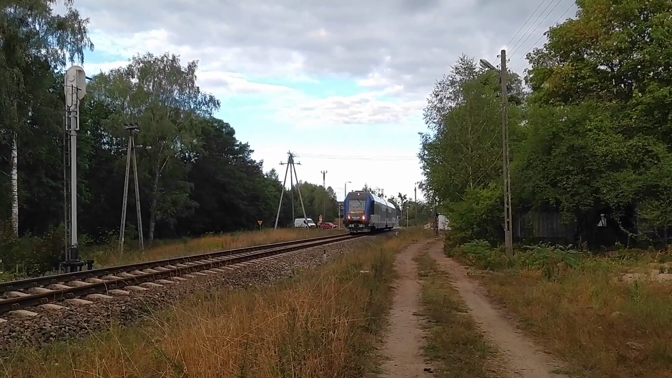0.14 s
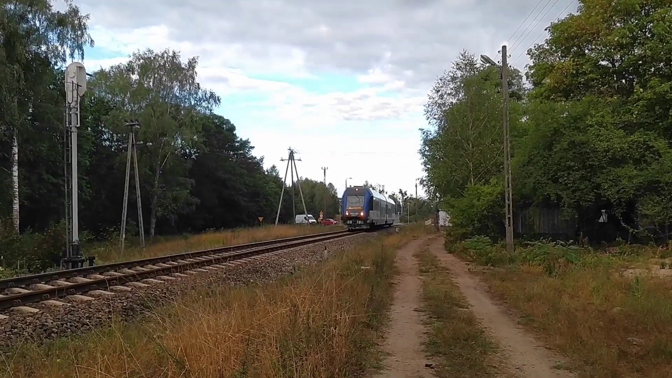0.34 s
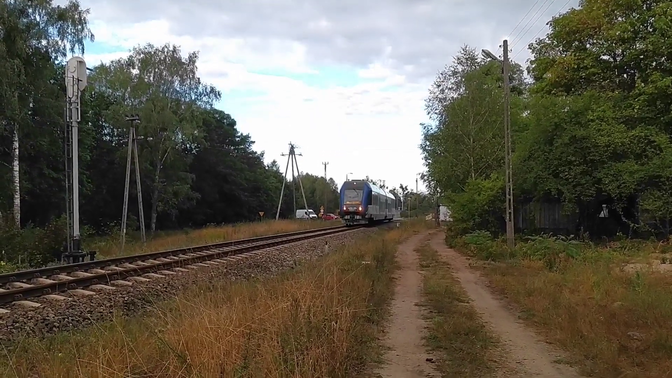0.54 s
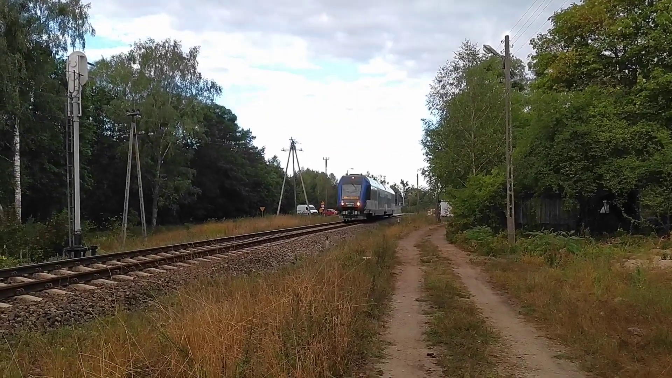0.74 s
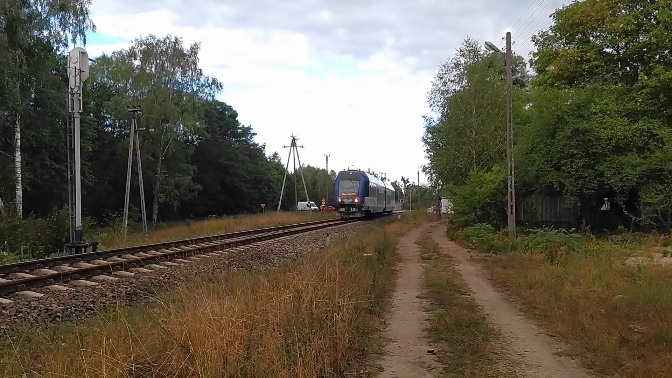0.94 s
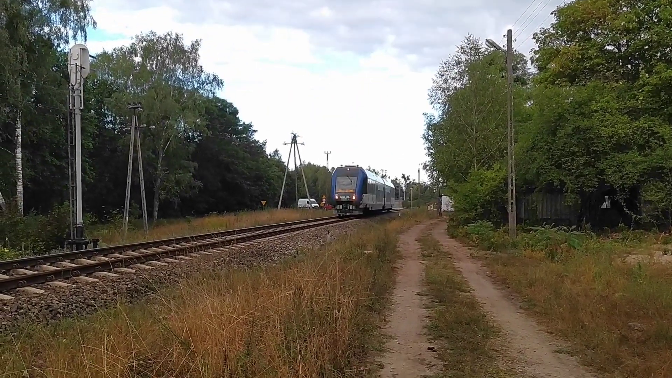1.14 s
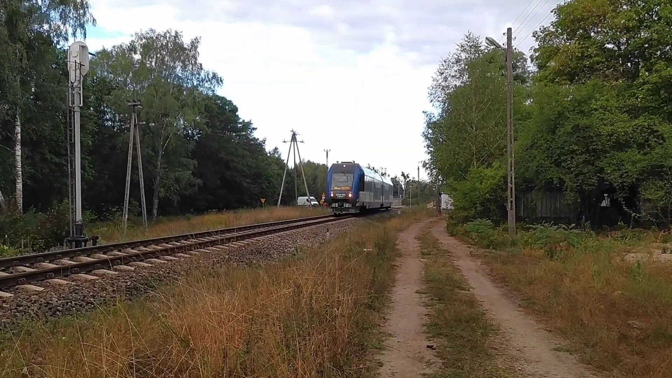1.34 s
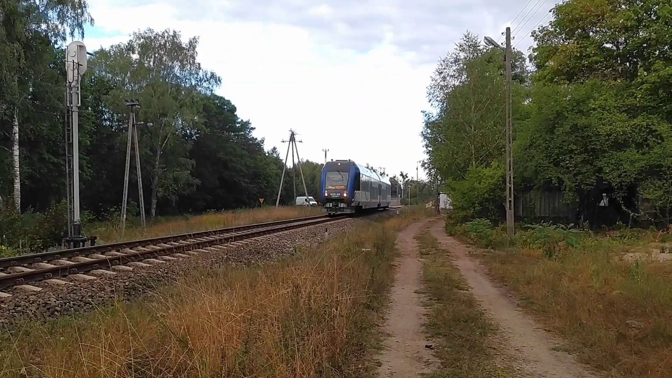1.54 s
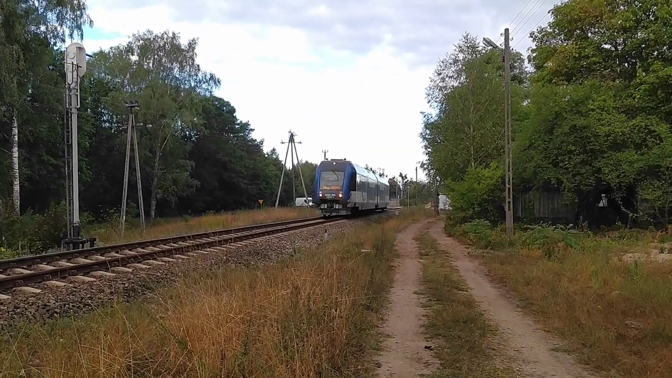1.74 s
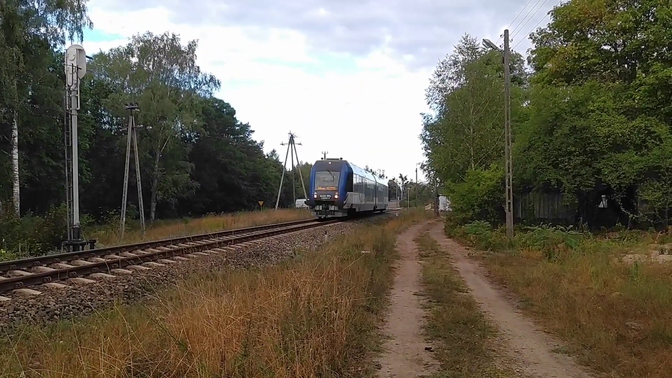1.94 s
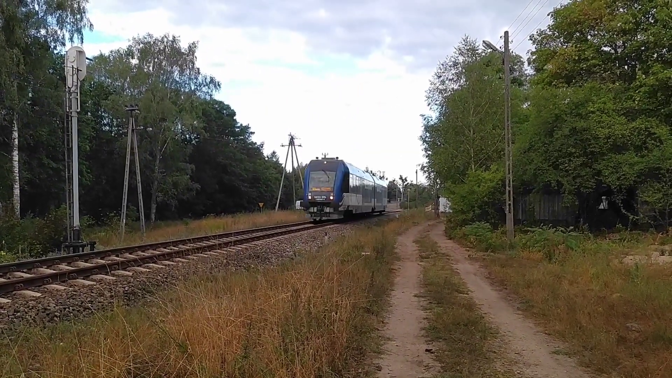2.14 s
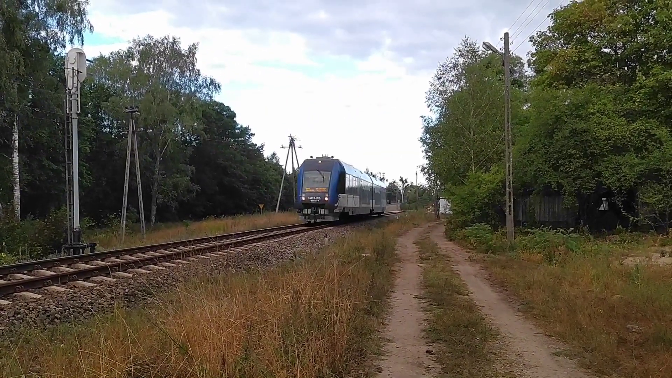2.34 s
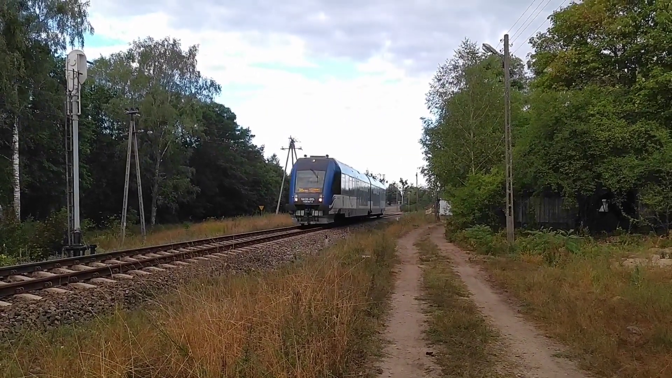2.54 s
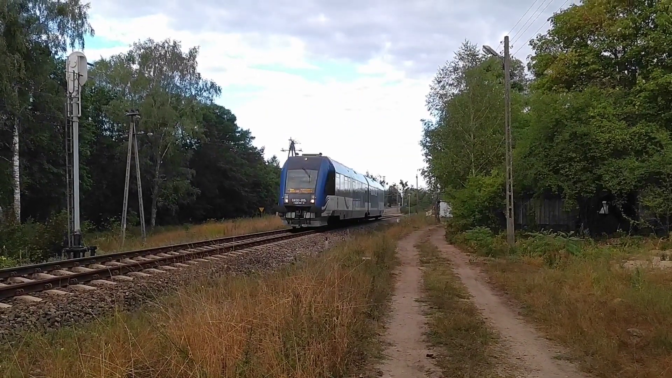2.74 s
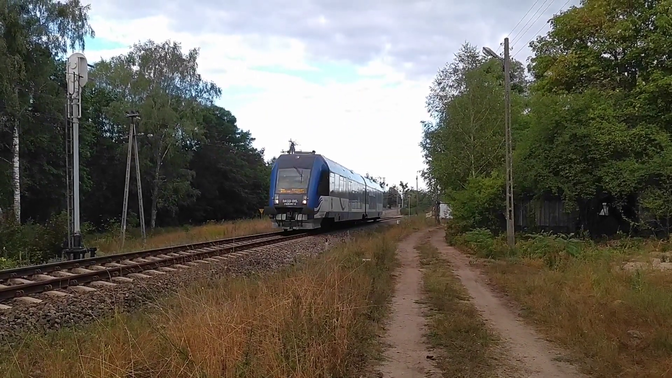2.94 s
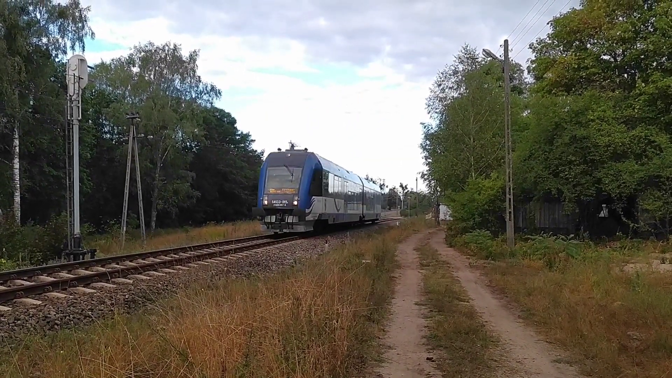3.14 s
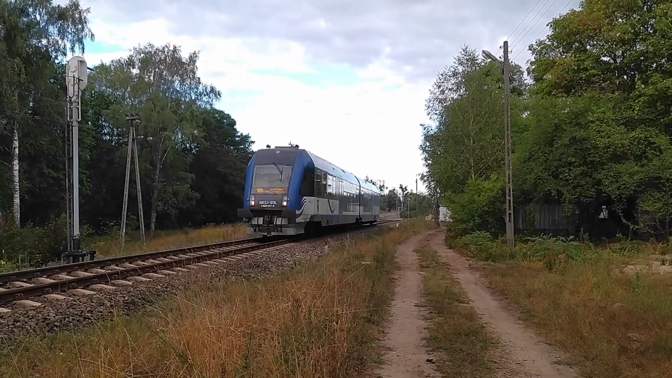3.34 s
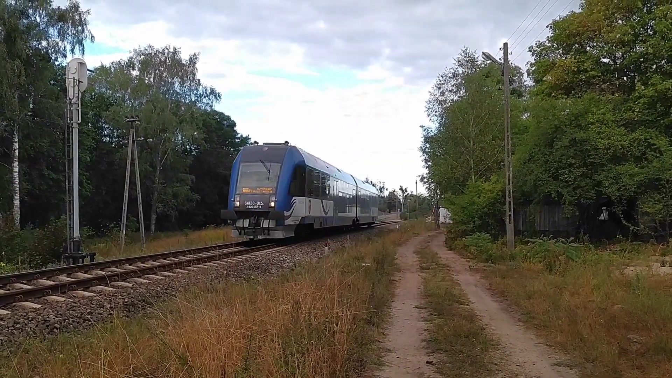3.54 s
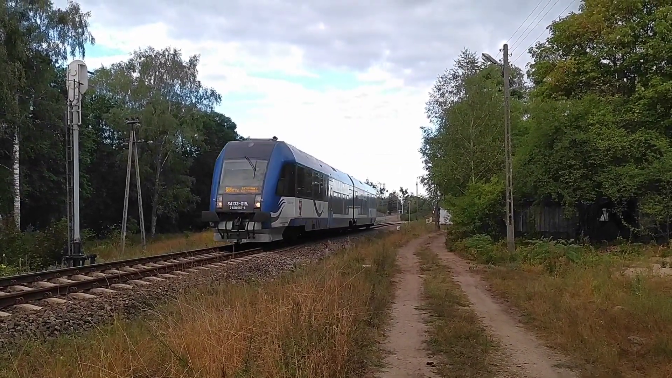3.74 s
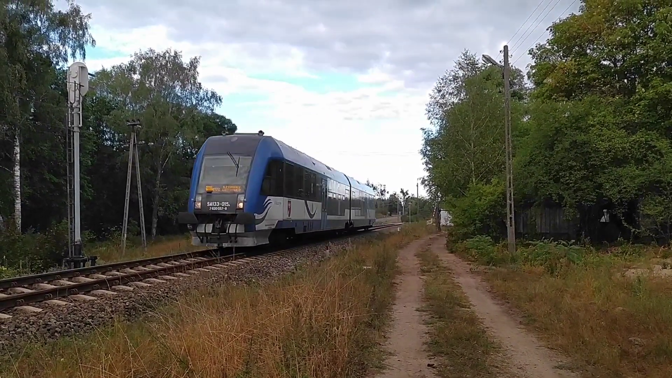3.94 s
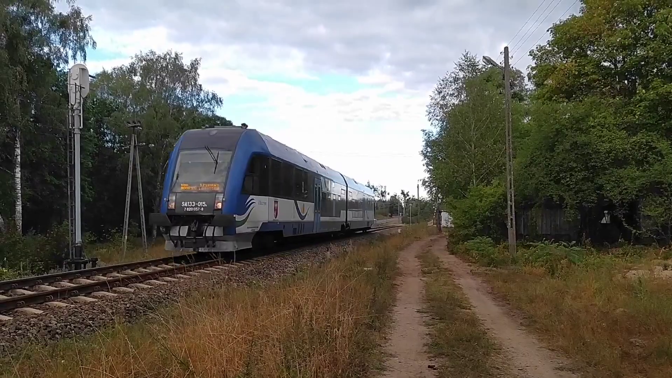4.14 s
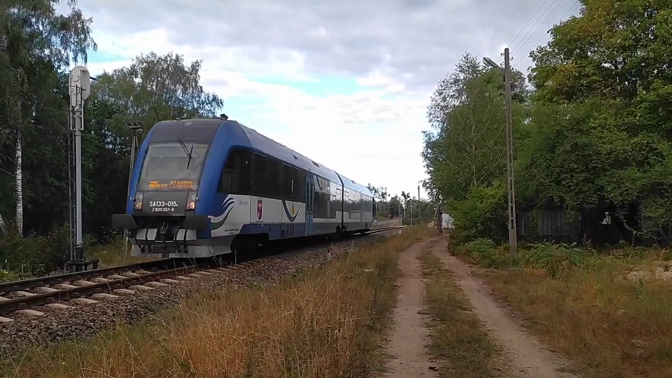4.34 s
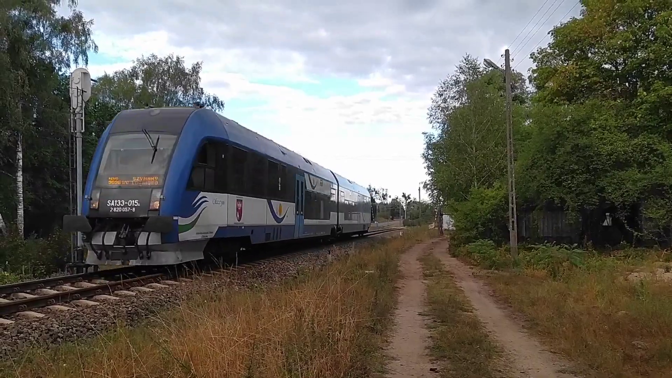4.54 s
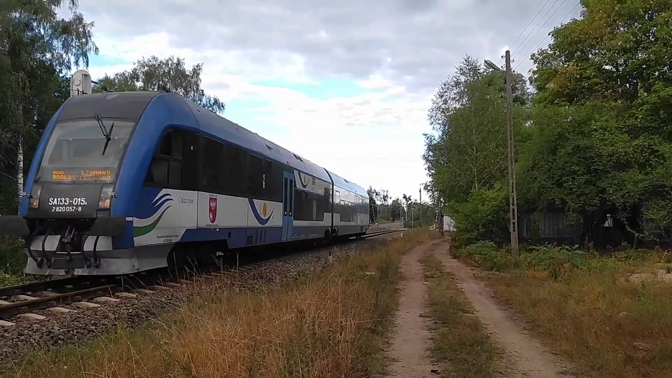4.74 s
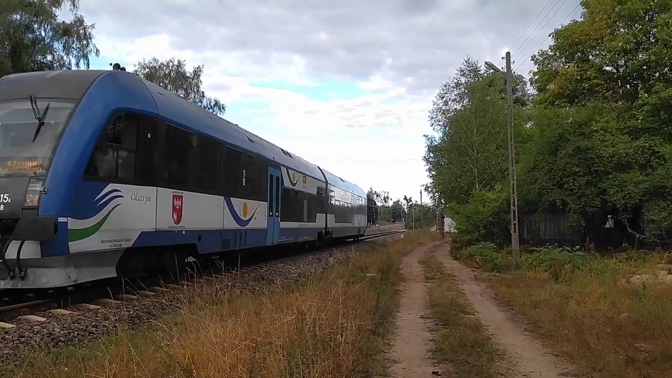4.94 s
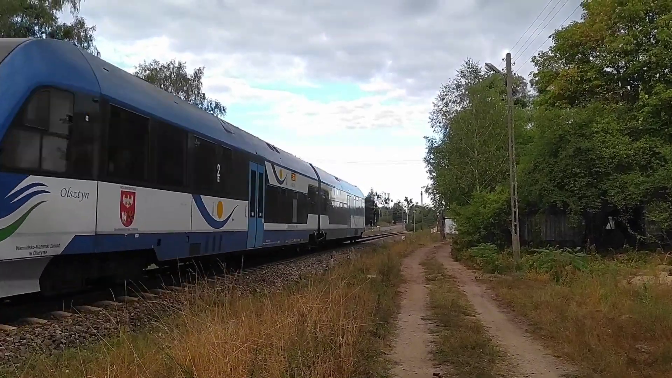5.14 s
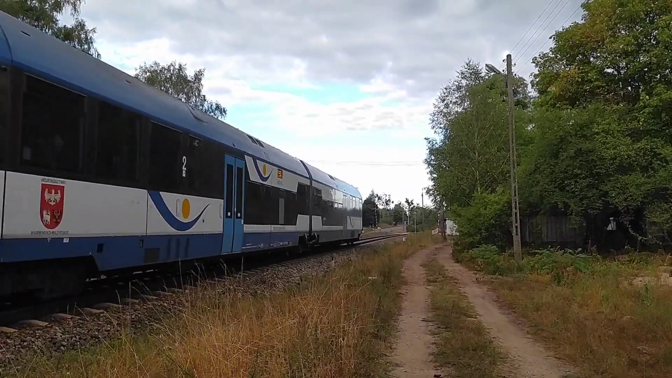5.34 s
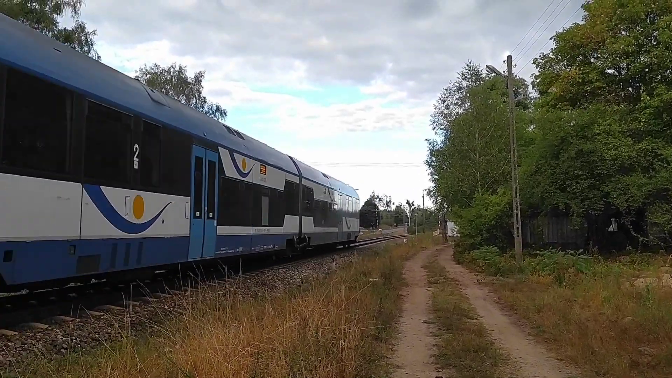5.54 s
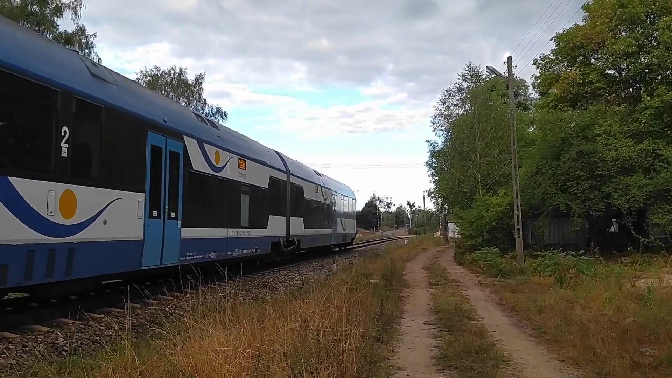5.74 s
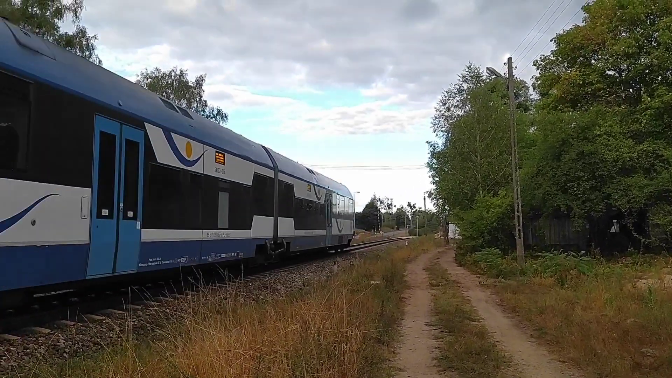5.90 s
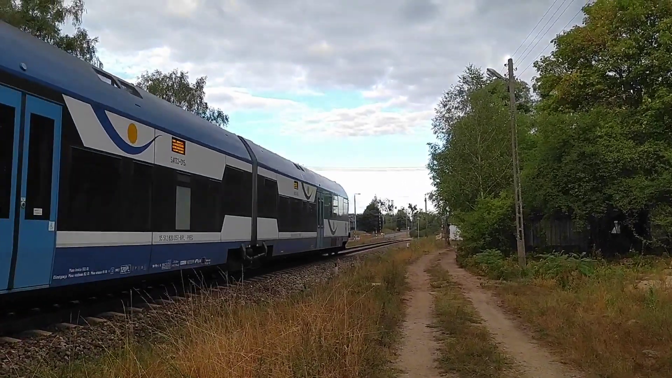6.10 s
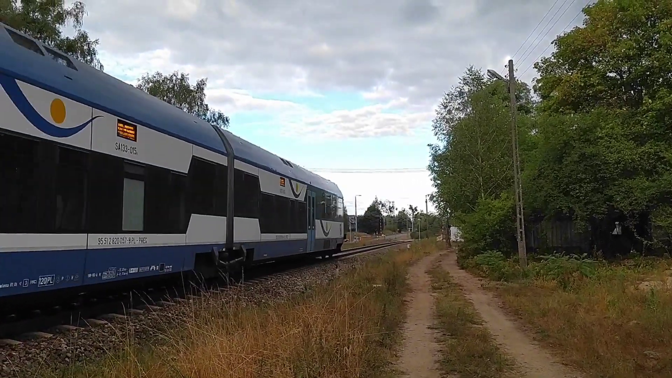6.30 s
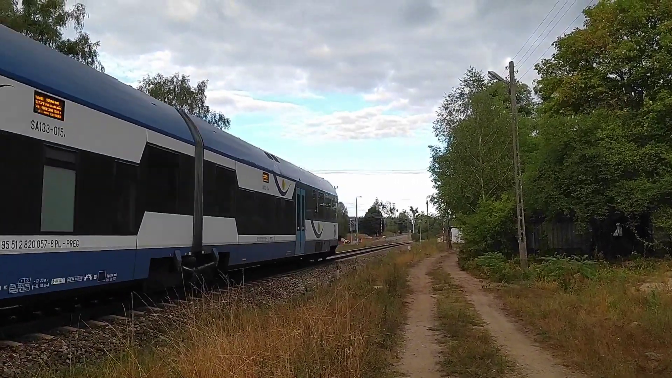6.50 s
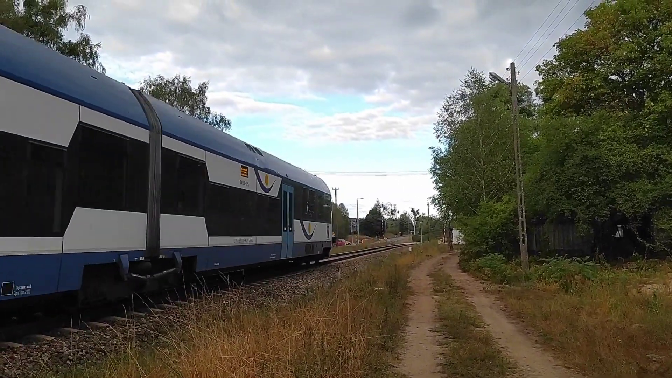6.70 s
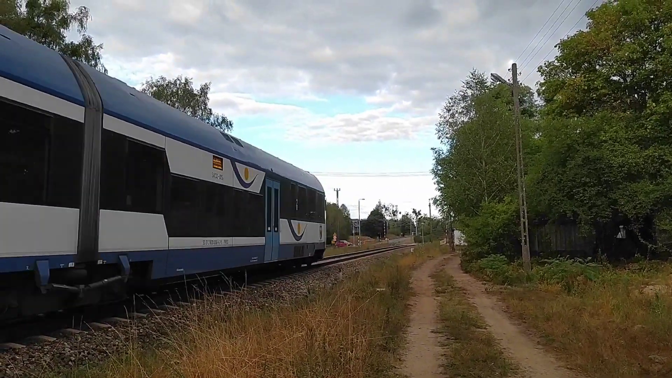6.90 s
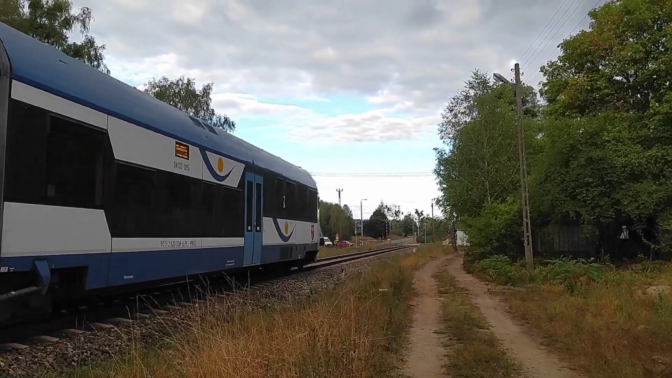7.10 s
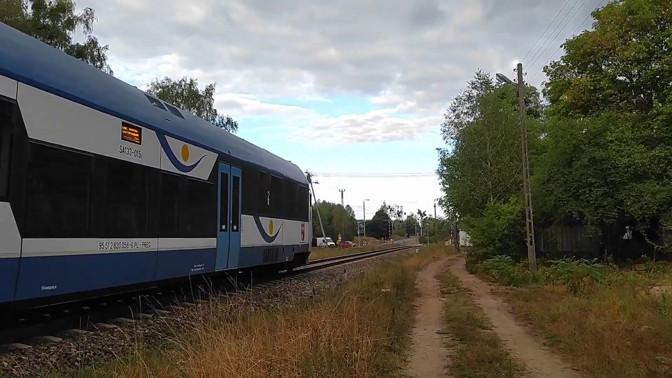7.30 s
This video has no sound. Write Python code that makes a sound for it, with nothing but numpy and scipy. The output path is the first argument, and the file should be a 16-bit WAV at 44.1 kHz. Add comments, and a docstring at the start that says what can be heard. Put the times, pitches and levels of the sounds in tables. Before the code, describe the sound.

A diesel railbus approaches through woods, droning and whistling, then roars past very close with two sharp rail-joint clacks and rattling running gear.

```python
"""A diesel railbus comes out of the woods and passes a few metres from a hand-held camera.
Its exhaust drones in steady tones, the turbochargers wind down as wavering whistles in hazy noise,
the wheels roar as shaped noise with singing resonances, and ringing modes make the joint clacks and knocks.
The right port hears the train; the covered left one picks up little but the rumble and knocks of the hand."""
import sys
import numpy as np
from scipy import signal
from scipy.fft import rfft, irfft
from scipy.io import wavfile
from scipy.ndimage import uniform_filter1d

SR = 44100
rng = np.random.default_rng(int(sys.argv[2]) if len(sys.argv) > 2 else 0)


def dump_mix(stems):
    """Bounce the given channels to the path in sys.argv[1] as a 16-bit WAV at rate SR."""
    frames = np.atleast_2d(stems).T  # one column per channel
    limited = np.clip(frames, -1, 1)  # hard clip at full scale
    pcm = np.round(limited * 32767).astype(np.int16)
    wavfile.write(sys.argv[1], SR, pcm)


N = 328986
TIME = np.arange(N) / SR
# the roar is built in overlapping short frames, each with its own spectrum
FRAME = 2048  # samples
HOP = FRAME // 4
FRAME_S = np.arange(N // HOP + 3)[:, None] * HOP / SR
BIN_HZ = np.fft.rfftfreq(FRAME, 1 / SR)

# Every "pass" tuple below is: peak level in dB, loudest moment in seconds,
# half-width in seconds, dB lost per tenfold distance.

# The hand and small sounds nearby
# Rumble colour of the hand. Each row: frequency in Hz, relative level in dB per Hz.
HAND_COLOUR = [(4, -57), (12, -38), (24, -52), (45, -55), (70, -66.5), (105, -85), (170, -86), (350, -99),
               (700, -106), (1900, -114), (3300, -121), (12000, -128)]
# Loudness of that rumble. Each row: time in seconds, level in dB.
HAND_LEVEL = [(0, -33.5), (1.9, -33), (3.2, -29.5), (5.3, -30.5), (7.46, -30.5)]
# Firmest knocks of the hand. Each row: start in seconds, level in dB.
HAND_KNOCKS = [(.249, -27), (1.108, -23.5), (2.95, -17), (4.187, -19), (4.636, -24), (4.931, -15.5),
               (5.72, -26), (6.071, -20)]
# The fingertip gives like a soft spring.
# Each row: frequency in Hz before a random change of stiffness, level in dB, time to fall 60 dB in seconds.
FINGERTIP_MODES = [(65, 4, 0.033), (128, -5, 0.034), (219, -12, 0.052)]
SOFT_KNOCKS_PER_S, SOFT_KNOCK_DB, SOFT_KNOCK_SPREAD_DB = 2.2, -40, 5
# Faint dry ticks nearby. Each row: time of the snap in seconds, level in dB.
TICKS = [(.715, -55), (.971, -54), (2.49, -61), (2.69, -63)]
# What a tick is made of. Each row: seconds after the snap (negative is before), lowest Hz, highest Hz,
# level in dB, time to fall 60 dB in seconds.
TICK_PARTS = [(-.011, 4200, 4800, -4, .12), (0, 6700, 8100, 0, .06), (0, 8100, 12000, -17, .06),
              (.011, 5800, 7500, -7, .05)]

# Air and running gear
# Air hissing along the cars. Each row: time in seconds, level in dB.
SLIPSTREAM_LEVEL = [(0, -139), (5, -70), (6, -58.5), (6.5, -51.5), (7, -62.5), (7.46, -58.5)]
RATTLES_PER_S, RATTLE_SPREAD_DB = 24, 9
RATTLE_PASS = (-28, 6.5, .7, 36)
# Knocks in the bogie. Each row: start in seconds, level in dB.
CLUNKS = [(5.937, -29), (6.3505, -27), (6.3925, -23), (6.5455, -22.5), (6.5505, -24), (6.571, -27),
          (6.642, -27), (6.705, -24), (7.137, -29), (7.248, -27)]
# Slack sleepers pressed down. Each row: start in seconds, level in dB.
THUMPS = [(5.14, -41), (5.365, -39), (5.732, -35), (5.97, -36), (6.147, -36), (7.324, -36)]
# Wheels over the joint. Each row: start in seconds, level in dB, treble tilt in dB per octave,
# rebound level in dB relative to the blow, delay of the sleeper's thud in seconds.
JOINTS = [(6.3402, -23, -.4, -4, .002), (6.5312, -23.5, 1.2, -.5, .0115)]
REBOUND_S, RAIL_LAG_S = .004, .0026
# What a joint blow shakes loose, before the treble tilt. Each row: lowest Hz, highest Hz, level in dB,
# rise in seconds, time to fall 60 dB in seconds.
CLATTER = [(147, 397, -3, 0.008, 0.2), (382, 1500, -2, 0.006, 0.22), (1300, 2600, -1.5, 0.0006, 0.12),
           (2500, 3800, -2.5, 0.003, 0.11), (3800, 7000, -7.5, 0.0004, 0.1), (7050, 12000, -23, .001, 0.08)]
# Modes that ring at each blow, slightly retuned each time. Each row: frequency in Hz, level in dB,
# rise in seconds, time to fall 60 dB in seconds. The joint also tilts the wheel levels,
# and the rattle also shifts the frame pitches.
WHEEL_MODES = [(1434, -9, .0017, .27), (1540, 13.5, .0008, .015), (2020, 10, .0006, .02),
               (2600, 1, .0008, .035), (3380, -4, .0005, .04)]
RAIL_MODES = [(627, -10, .0063, .11), (560, 13, .0016, .014), (860, 8, .0014, .016)]
FRAME_MODES = [(425, -5, .002, .09), (620, 2, .0015, .035), (890, -4, .001, .04), (1300, -2, .0008, .025)]
SLEEPER_MODES = [(204, 9, 0.008, .16), (272, 7.5, 0.009, 0.12)]

# Wheels and rails
PASS_S, SPEED, TRACK_DISTANCE = 6.15, 13.2, 6.6  # train abreast (s), speed (m/s), distance to the track (m)
# A pair of tones under the leading car: lower tone at rest (Hz), abreast (s)
WHINE_HZ, WHINE_ABREAST_S = 3462, 5.95
WHINE_SWELL = (5.75, 2.2, -46)  # loudest at (s), length (s), dB
# The ringing wheel: pitch at rest (Hz), abreast (s)
RING_HZ, RING_ABREAST_S = 1458, 6.2
# Its swells. Each row: loudest moment in seconds, length in seconds, level in dB.
RING_SWELLS = [(6.3, 0.4, -39), (6.77, 0.32, -38), (7.17, 0.44, -42)]
# A wheel moans as the train draws near.
# Each row: loudest moment in seconds, length in seconds, pitch in Hz, level in dB.
MOANS = [(3.497, .35, 631, -52), (3.834, 0.42, 629, -49.5), (4.55, 0.53, 650, -48.5),
         (5.302, 0.64, 650.5, -38.5)]
# Rumble, roar and hiss. Each row: lowest Hz, highest Hz.
ROLLING_BANDS = [(180, 550), (750, 2800), (3800, 11000)]
# One bogie rolling past, a row for each of those bands. Each row: peak level in dB, loudest moment
# in seconds, half-width in seconds, dB lost per tenfold distance, level of the next bogie in relative dB.
BOGIE_PASSES = [(-31.5, 6.46, 0.65, 32, 3), (-32, 6.34, 0.68, 25, -4), (-37, 6.17, 0.4, 24, -9.5)]
BOGIE_SPACING = 22.2  # m
# Colour of the rolling noise from afar and alongside, before the bands are set to the bogie levels.
# Each row: frequency in Hz, relative level in dB per Hz.
FAR_COLOUR = [(20, -64), (90, -71), (170, -68.5), (250, -75.5), (360, -86), (520, -87.5), (850, -88),
              (1300, -81.5), (1900, -90), (2700, -93), (3300, -98), (7200, -99), (8300, -107), (9200, -109),
              (10000, -120), (12000, -123)]
NEAR_COLOUR = [(20, -79), (50, -74), (95, -63.5), (180, -57), (350, -60.5), (700, -58.5), (950, -63.5),
               (1500, -62.5), (2000, -65.5), (2600, -65.5), (3900, -73.5), (5300, -71), (7000, -77.5),
               (9000, -96), (13000, -106)]
# Blend of the two colours. Each row: time in seconds, share of the near colour from 0 to 1.
NEARNESS = [(0, 0.11), (2.5, 0.11), (4.2, 0.27), (5.5, 0.94), (7.46, 1)]
# Singing resonances of wheels, rails and fans. Each row: frequency at rest in Hz, width in Hz,
# dB over the roar, loudest moment in seconds, spread around it in seconds.
SINGING = [(159, 18.3, 14, 5.6, 1.1), (248, 52, 5.5, 5.57, 0.55), (408.4, 22, 11.5, 4.82, 0.57),
           (580, 44, 11, 0.85, 2.5), (621, 63, 11.5, 4.9, 0.78), (680, 38, 9.5, 0.74, 3),
           (1010, 58, 6, 4, 1.34), (1137, 66, 9, 5.13, 1.14), (1500, 47, 8.5, 5.5, 0.86),
           (1460, 210, 3, 6.8, 0.71), (1756, 84, 7.5, 5.4, 1.4), (2272, 340, 10, 5.12, 0.88),
           (2580, 200, 6, 6.85, 0.46), (2870, 96, 11, 5.4, 0.52), (4580, 330, 5.5, 2.8, 3)]
# The rails ring far ahead of the train, until its roar covers them.
# Each row: frequency in Hz, width in Hz, dB over the roar before it fades with nearness.
RAIL_SONG = [(1110, 87, 4), (1380, 73, 2), (1532, 28, 9), (2313, 186, 8), (2973, 41, 9), (4250, 120, 5.5),
             (5280, 54, -4), (6470, 65, 3.5), (7340, 240, 3)]
# Resonances change as the wheels rub: share of height, share of pitch, changes per second
SURGE, WANDER, RUB_RATE = .2, .005, 7

# Turbochargers and engines
# Blade whistles of the two turbochargers. Each row: time in seconds, pitch in Hz, level in dB.
HIGH_TURBO = [(0, 6150, -91), (1, 6320, -81), (1.5, 6130, -71), (1.9, 5970, -73), (2.3, 5820, -69),
              (2.9, 5740, -63.5), (3.8, 5530, -63.5), (4.1, 5490, -57.5), (4.47, 5410, -54.5),
              (4.75, 5345, -48.5), (5.05, 5280, -52), (5.3, 5230, -52.5), (5.65, 5150, -47),
              (5.95, 5220, -48.5), (6.24, 5205, -39), (6.6, 5200, -47), (6.93, 5130, -48.5),
              (7.02, 5130, -73)]
LOW_TURBO = [(1.2, 5850, -90), (1.6, 5830, -76), (2.5, 5620, -69), (3.3, 5430, -65), (4, 5220, -61),
             (4.7, 5060, -59), (5.5, 4990, -52), (5.85, 4720, -52), (6.2, 4660, -45.5), (6.6, 4660, -66)]
TURBO_DIRECT = (-1.5, 4.9, 1.1, 18)  # a pass: how much of the whistle arrives unscattered
LOW_TURBO_SHADE_DB = -7  # less of the low whistle arrives unscattered
# Passes of their intake haze
HIGH_HAZE, LOW_HAZE = (-51, 6, 1, 56), (-76, 2.5, 2.5, 34)
# The driver eases off, and the firing rate settles from running to idle
EASE_OFF_S, RUN_HZ, IDLE_HZ, SETTLE_S = 1.4, 65.57, 61.38, 2.2
LEAD_ENGINE_PASS = (-25.5, 6.22, 1.45, 36)
REAR_ENGINE_PASS = (-30, 7.5, 0.36, 43)
# The rear engine is still approaching, so it sounds higher and beats with the leading one
BEAT_HZ, BEAT_DIP_S = 2.86, 6.92
DRONE_SWELL = (3.16, 1.2, -42)  # loudest at (s), length (s), dB
# Octave of the firing tone. Each row: time in seconds, level in dB before a fixed lift in exhaust().
OCTAVE_LEVEL = [(0.0, -51), (0.29, -48), (1.68, -52), (2.18, -43.5), (2.78, -47.5), (3.05, -42),
                (3.59, -47.5), (3.86, -42), (4.26, -46.5), (4.76, -41), (5.55, -54.5), (5.98, -39.5),
                (6.71, -32.5), (7.46, -51)]
# Weaker exhaust lines; the engine fires three times a turn.
# Each row: multiple of the shaft speed, dB relative to the leading engine's firing tone.
SHAFT_ORDERS = [(2, -15.5), (4, -29.5), (5, -48), (7, -24), (9, -24.5), (12, -46)]
EDGE_HZ = 13200  # upper edge of the camera's sound


def amp(db):
    """Decibels to gain."""
    return 10 ** (np.asarray(db) / 20)


def unit(x):
    """Scales to rms 1."""
    return x / np.sqrt(np.mean(x ** 2) + 1e-30)


def curve(rows, t=TIME):
    """Every column of a table of (s, values) at the times t."""
    s, *columns = np.transpose(rows)
    return [np.interp(t, s, c) for c in columns]


def colour(points, hz):
    """Reads a spectrum in dB on a log-frequency axis."""
    f, db = np.transpose(points)
    return np.interp(np.log(hz + 1), np.log(f), db)


def add(mix, s, sound):
    """Mixes a sound in at time s."""
    part = mix[round(s * SR):][:len(sound)]
    part += sound[:len(part)]


def slow_noise(count, step_s, rate_hz):
    """Random motion of rms 1 whose spectrum falls away smoothly around rate_hz."""
    hz = np.fft.rfftfreq(count, step_s)
    spectrum = rfft(rng.standard_normal(count)) * np.exp(-(hz / rate_hz) ** 2)
    return unit(irfft(spectrum, count))


def drift(rate_hz):
    """Random motion with one value per sample."""
    return slow_noise(N, 1 / SR, rate_hz)


def frame_drift(rate_hz):
    """Random motion with one value per frame."""
    return slow_noise(len(FRAME_S), FRAME_S[1, 0], rate_hz)[:, None]


def dying(t, t60):
    """Exponential decay by 60 dB in t60."""
    return np.exp(-np.log(1000) * t / t60)


def band_noise(count, low_hz, high_hz):
    """Noise of rms 1 between two steep edges."""
    band = signal.butter(6, [low_hz, min(high_hz, .45 * SR)], "band", fs=SR, output="sos")
    return unit(signal.sosfilt(band, rng.standard_normal(count)))


def burst(t, low_hz, high_hz, rise, t60):
    """A band of noise that swells and dies."""
    return band_noise(len(t), low_hz, high_hz) * (1 - np.exp(-t / rise)) * dying(t, t60)


def ring(t, modes):
    """The modes of a struck part, a little different at every blow."""
    out = np.zeros(len(t))
    for hz, db, rise, t60 in modes:
        tone = np.sin(2 * np.pi * hz * rng.uniform(.97, 1.03) * t)
        out += amp(db) * tone * (1 - np.exp(-(t / rise) ** 2)) * dying(t, t60)
    return out


def swell(peak_s, length_s, db):
    """Gain of one smooth rise and fall."""
    return amp(db) * np.cos(np.pi * np.clip((TIME - peak_s) / length_s, -.5, .5)) ** 2


def passing(t, peak_db, peak_s, half_width_s, fall_db):
    """Level in dB of a source that goes by in a straight line, falling with its distance."""
    return peak_db - fall_db * np.log10(np.hypot(1, (t - peak_s) / half_width_s))


def doppler(t, abreast_s=PASS_S):
    """Pitch factor of a source on the track: high while it approaches, low once past."""
    along = SPEED * (t - abreast_s)
    return 1 / (1 + SPEED / 343 * along / np.hypot(along, TRACK_DISTANCE))


def phase(hz):
    """Running angle of a tone that follows a pitch curve."""
    return 2 * np.pi * np.cumsum(hz) / SR


def whistle(hz, width_hz):
    """A narrow, fuzzy line that follows a pitch curve."""
    angle = phase(hz)
    return drift(width_hz) * np.cos(angle) + drift(width_hz) * np.sin(angle)


def hand(onset=0.0036):
    """Skin on the covered port: a deep unsteady rumble, and a dull knock whenever the grip slips."""
    grip_db, = curve(HAND_LEVEL)
    gain = amp(colour(HAND_COLOUR, np.fft.rfftfreq(N, 1 / SR)))
    rumble = unit(irfft(rfft(rng.standard_normal(N)) * gain, N))
    out = amp(grip_db) * rumble
    # small slips come at random, besides the listed firm knocks
    slips = rng.random(N) < SOFT_KNOCKS_PER_S / SR
    soft_db = SOFT_KNOCK_DB + SOFT_KNOCK_SPREAD_DB * rng.standard_normal(N)
    t = np.arange(SR // 10) / SR
    for s, db in list(HAND_KNOCKS) + list(zip(TIME[slips], soft_db[slips])):
        stiffness = rng.uniform(.85, 1.1)
        knock = np.zeros(len(t))
        for hz, mode_db, t60 in FINGERTIP_MODES:
            knock += amp(mode_db) * np.sin(2 * np.pi * hz * stiffness * t) * dying(t, t60)
        add(out, s, -amp(db) * knock * (1 - np.exp(-(t / onset) ** 2)))
    return out


def ticks():
    """Small bright ticks: short noise bands form a soft scrape, then a sharper, higher snap."""
    out, t = np.zeros(N), np.arange(SR // 10) / SR
    for s, db in TICKS:
        for lag_s, lo, hi, part_db, t60 in TICK_PARTS:
            add(out, s + lag_s, amp(db + part_db) * burst(t, lo, hi, .0007, t60))
    return out


def slipstream(top_db=-5):
    """Fine hiss of the air dragged along the cars."""
    db, = curve(SLIPSTREAM_LEVEL)
    return amp(db) * (band_noise(N, 7330, 9170) + amp(top_db) * band_noise(N, 8200, 11800))


def rattle():
    """The running gear rattles at random; each part has its own size, and so its own pitch."""
    out, t = np.zeros(N), np.arange(SR // 10) / SR
    for when, size, force in rng.random((round(RATTLES_PER_S * N / SR), 3)):
        s = when * TIME[-1]
        pitch = 2 ** (size - .5)
        modes = [(hz * pitch, db, rise, t60) for hz, db, rise, t60 in FRAME_MODES]
        level_db = passing(s, *RATTLE_PASS) - RATTLE_SPREAD_DB * force
        add(out, s, amp(level_db) * ring(t, modes))
    return out


def clunks():
    """Loose parts of the jolted bogie knock against its frame, and slack sleepers thump under the wheels."""
    out, t = np.zeros(N), np.arange(SR // 4) / SR
    for blows, modes in (CLUNKS, FRAME_MODES), (THUMPS, SLEEPER_MODES):
        for s, db in blows:
            add(out, s, amp(db) * ring(t, modes))
    return out


def joints():
    """Each wheel cracks onto the rail end and rebounds; the rail pings, then the sleeper thuds."""
    out, t = np.zeros(N), np.arange(SR // 2) / SR
    for s, db, tilt_db, rebound_db, sink_s in JOINTS:
        clatter = np.zeros(len(t))
        for lo, hi, band_db, rise, t60 in CLATTER:
            tilted_db = band_db + tilt_db * np.log2(lo / 1000)
            clatter += amp(tilted_db) * burst(t, lo, hi, rise, t60)
        # the clatter grows lumpy over its first 20 ms
        lumps = 1 + (amp(2.8 * drift(70)[:len(t)]) - 1) * np.minimum(t / .02, 1)
        wheel = [(hz, mode_db + tilt_db * np.log2(hz / 1700), rise, t60)
                 for hz, mode_db, rise, t60 in WHEEL_MODES]
        add(out, s, amp(db) * (clatter * lumps + ring(t, wheel)))
        add(out, s + REBOUND_S, amp(db + rebound_db) * ring(t, wheel))
        add(out, s + RAIL_LAG_S, amp(db) * ring(t, RAIL_MODES))
        add(out, s + sink_s, amp(db) * ring(t, SLEEPER_MODES))
    return out


def whine(upper_db=-3):
    """Two close, fuzzy tones from the running gear, wavering together."""
    hz = WHINE_HZ * doppler(TIME, WHINE_ABREAST_S) + 14 * drift(9)
    pair = whistle(hz, width_hz=44) + amp(upper_db) * whistle(hz * 1.042, width_hz=44)
    return swell(*WHINE_SWELL) * amp(2 * drift(7)) * pair


def wheel_ring(fuzz=.8):
    """One wheel mode rings on over the roar and sinks in pitch as the bogie goes by."""
    hz = RING_HZ * doppler(TIME, RING_ABREAST_S) + 6 * drift(12)
    tone = np.sqrt(2) * np.cos(phase(hz))
    swells = sum(swell(*row) for row in RING_SWELLS)
    return swells * unit(tone + fuzz * whistle(hz, width_hz=22))


def moan(fuzz=0.9, waver_hz=9):
    """One wheel mode, rubbed into a firm but unsteady tone that swells and sinks."""
    hz, = curve([(s, pitch) for s, _, pitch, _ in MOANS])
    swells = sum(swell(s, length, db) for s, length, _, db in MOANS)
    tone = np.sqrt(2) * np.cos(phase(hz + waver_hz * drift(14.6)))
    return swells * unit(tone + fuzz * whistle(hz, width_hz=20))


def rubbed(hz, centre_hz, width_hz):
    """Shape of a resonance, about 1 at its centre, that surges and wanders as the wheels rub."""
    offset_hz = hz - centre_hz * (1 + WANDER * frame_drift(RUB_RATE))
    return (1 + SURGE * frame_drift(RUB_RATE)) / (1 + (2 * offset_hz / width_hz) ** 2)


def rolling_colour(near):
    """Spectrum in dB per frame: the ground swallows the low middle from afar, and resonances stand out."""
    field_db = (1 - near) * colour(FAR_COLOUR, BIN_HZ) + near * colour(NEAR_COLOUR, BIN_HZ)
    # a resonance sings while its part of the train faces the listener, and sinks in pitch as it passes
    rest_hz = BIN_HZ / doppler(FRAME_S)
    for hz, width, db, peak_s, lasting in SINGING:
        facing = np.exp(-((FRAME_S - peak_s) / lasting) ** 2 / 2)
        field_db = field_db + db * facing * rubbed(rest_hz, hz, width)
    for hz, width, db in RAIL_SONG:
        field_db = field_db + db * (1 - near) * rubbed(BIN_HZ, hz, width)
    return field_db


def bogies(next_db, *first_pass):
    """Level in dB of one band of rolling noise: the leading bogie, and the next one behind it."""
    first = amp(passing(FRAME_S, *first_pass))
    second = amp(next_db + passing(FRAME_S - BOGIE_SPACING / SPEED, *first_pass))
    return 20 * np.log10(np.hypot(first, second))


def rolling(patchy_db=1.0, judder_db=0.02):
    """Rough wheels roar on the rails: shaped noise whose rumble, roar and hiss swell at their own pace."""
    near, = curve(NEARNESS, FRAME_S)
    size = amp(rolling_colour(near))
    # bring each band to its bogie level, blending smoothly between band centres
    swell_db = 0
    centres = np.log([np.sqrt(lo * hi) for lo, hi in ROLLING_BANDS])
    for (lo, hi), (*first_pass, next_db), only in zip(ROLLING_BANDS, BOGIE_PASSES, np.eye(len(centres))):
        band = (BIN_HZ > lo) & (BIN_HZ < hi)
        power = np.sum(size[:, band] ** 2, axis=1, keepdims=True)
        share = np.interp(np.log(BIN_HZ + 1), centres, only)
        swell_db = swell_db + (bogies(next_db, *first_pass) - 10 * np.log10(power)) * share
    # smoothed noise makes the roar patchy in time and pitch
    real, imag, patches = rng.standard_normal((3,) + size.shape)
    patches = uniform_filter1d(patches, size=7, axis=0)
    patches = unit(uniform_filter1d(patches, size=9, axis=1))
    spectra = (real + 1j * imag) * size * amp(swell_db + patchy_db * patches)
    roar = signal.istft(spectra.T, nperseg=FRAME, noverlap=FRAME - HOP)[1][:N]
    return roar * np.sqrt(3 / 2) * amp(judder_db * drift(54))


def turbo(blades, haze_pass, clear_db, waver_hz=12):
    """A wavering blade whistle in a haze of intake noise; from afar the woods smear it into a hiss."""
    hz, db = curve(blades)
    hz = hz + waver_hz * drift(6.1)
    direct = amp(np.clip(passing(TIME, *TURBO_DIRECT) + clear_db, -30, 0))
    clear = unit(np.cos(phase(hz)) + .7 * whistle(hz, width_hz=26))
    smeared = whistle(hz, width_hz=130)
    core = direct * clear + np.sqrt(1 - direct ** 2) * smeared
    haze = amp(passing(TIME, *haze_pass)) * whistle(hz, width_hz=280)
    return amp(db + 1.8 * drift(9)) * core + haze


def coasting_s():
    """Time since the driver eased off."""
    return np.maximum(TIME - EASE_OFF_S, 0)


def exhaust(waver_db=0.5, uneven=0.8, octave_gain_db=6.5, third_db=-59, third_fade_db=1.0):
    """Firing tones of two engines and their overtones, with weaker shaft orders from unequal cylinders."""
    firing_hz = IDLE_HZ + (RUN_HZ - IDLE_HZ) * np.exp(-coasting_s() / SETTLE_S)
    angle = phase(firing_hz * doppler(TIME))
    firing_db = passing(TIME, *LEAD_ENGINE_PASS)
    # the drone swells once more on the approach
    lead = amp(firing_db + waver_db * drift(2.5)) + swell(*DRONE_SWELL)
    tone = lead * np.cos(angle)
    # subtracted, so that the two engines oppose each other at the dip of the beat
    rear_angle = angle + 2 * np.pi * BEAT_HZ * (TIME - BEAT_DIP_S)
    tone -= amp(passing(TIME, *REAR_ENGINE_PASS)) * np.cos(rear_angle)
    octave_db, = curve(OCTAVE_LEVEL)
    tone += amp(octave_db + octave_gain_db + waver_db * drift(2.8)) * np.cos(2 * angle)
    # the third harmonic fades steadily, by third_fade_db each second
    tone += amp(third_db - third_fade_db * TIME) * np.cos(3 * angle)
    for order, db in SHAFT_ORDERS:
        line = np.cos(order * angle / 3 + 2 * np.pi * rng.random())
        tone += amp(firing_db + db) * (1 + uneven * drift(17.0)) * line
    return np.sqrt(2) * tone


def scene(leak_db=-23, leak_hz=75, seep_db=-49):
    """The open right port hears the train; little but some bass leaks into the covered left one."""
    wheels = rolling() + moan() + whine() + wheel_ring() + joints() + clunks() + rattle()
    turbos = turbo(HIGH_TURBO, HIGH_HAZE, 0) + turbo(LOW_TURBO, LOW_HAZE, LOW_TURBO_SHADE_DB)
    outside = ticks() + slipstream() + wheels + turbos + exhaust()
    bass = signal.sosfilt(signal.butter(2, leak_hz, fs=SR, output="sos"), outside)
    left = hand() + amp(leak_db) * bass + amp(seep_db) * outside
    return np.array([left, outside])


def record(dry):
    """The camera's upper band limit, a steep low-pass, with soft ends."""
    ends = np.minimum(np.minimum(TIME, TIME[-1] - TIME) / .015, 1)
    low_pass = signal.firwin(511, EDGE_HZ, window=("kaiser", 9), fs=SR)
    return signal.oaconvolve(dry * ends, low_pass[None], "same", axes=1)


dry = scene()
out = record(dry)
dump_mix(out)
```